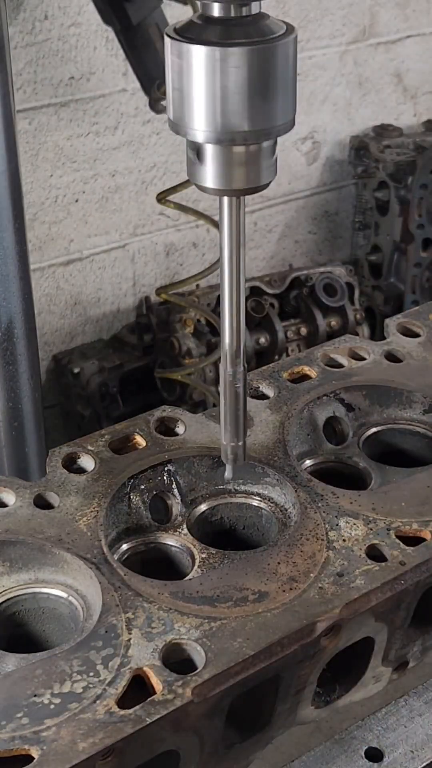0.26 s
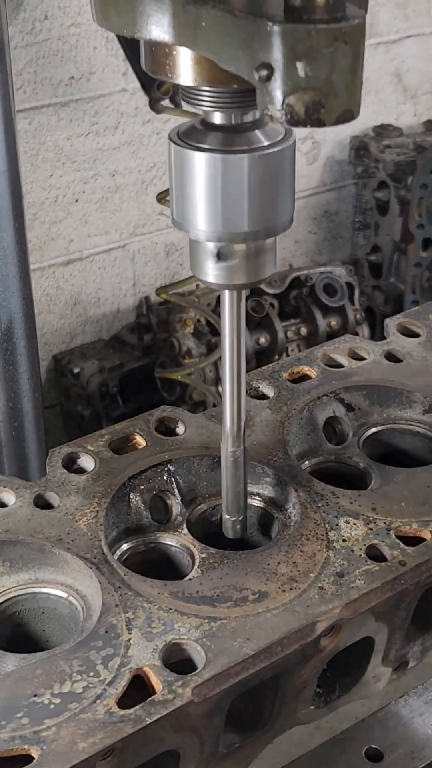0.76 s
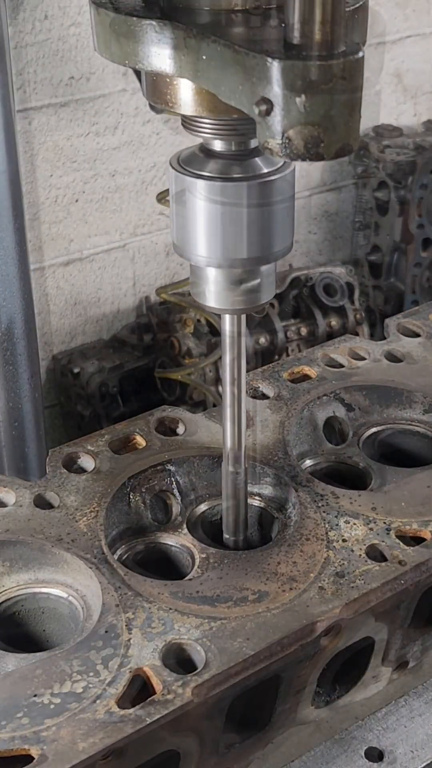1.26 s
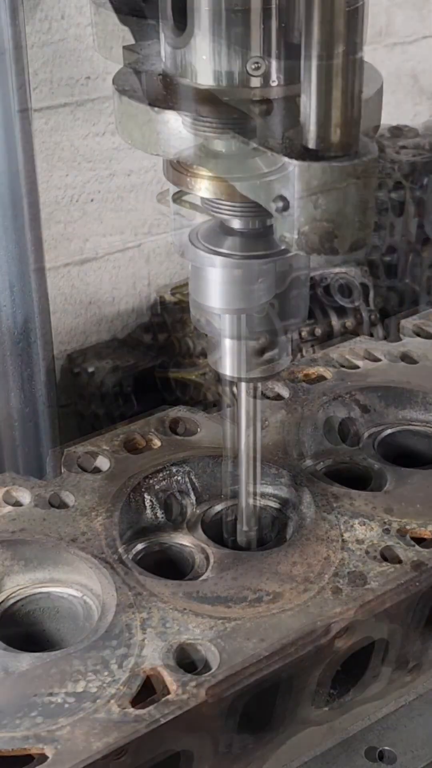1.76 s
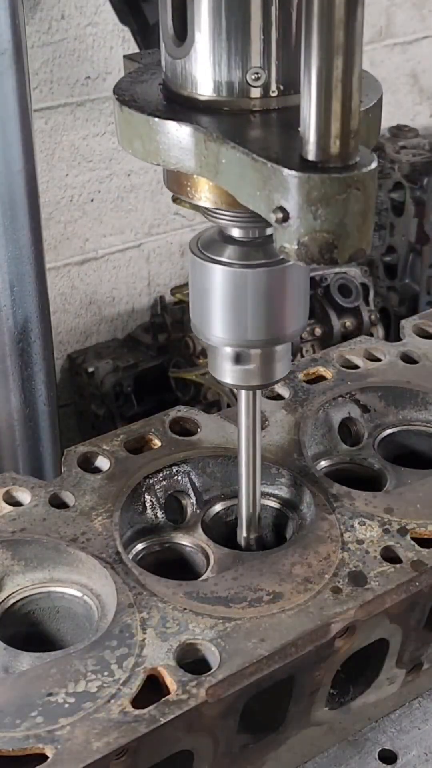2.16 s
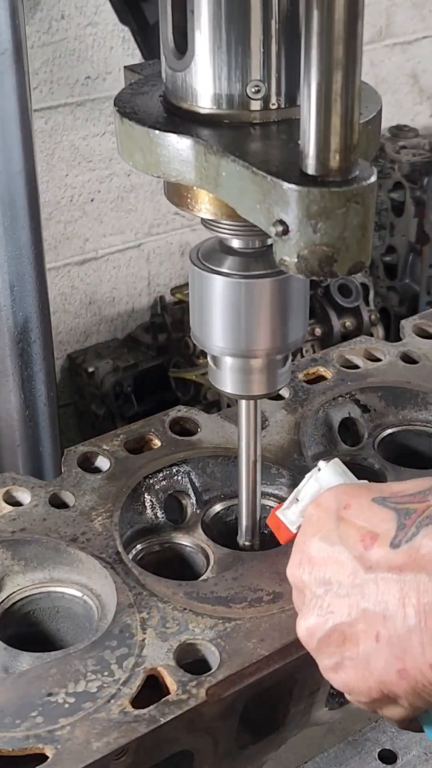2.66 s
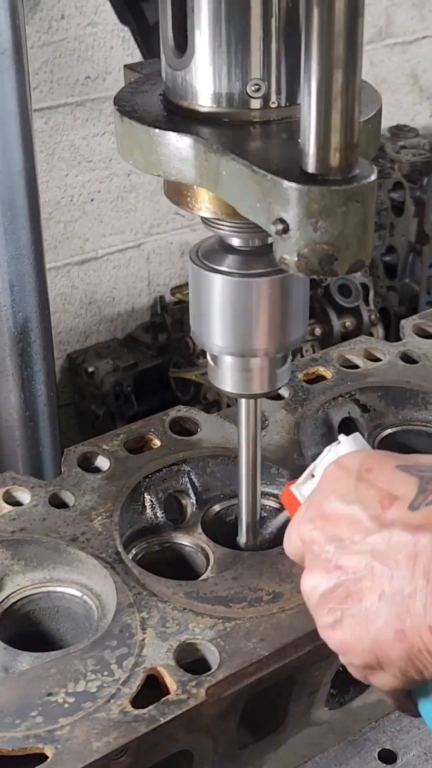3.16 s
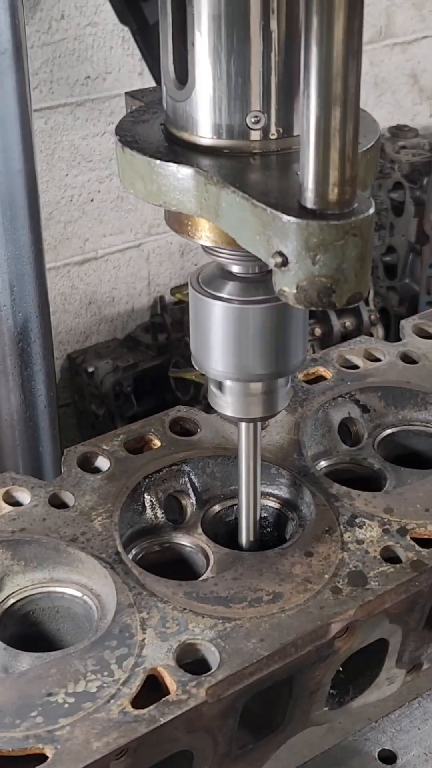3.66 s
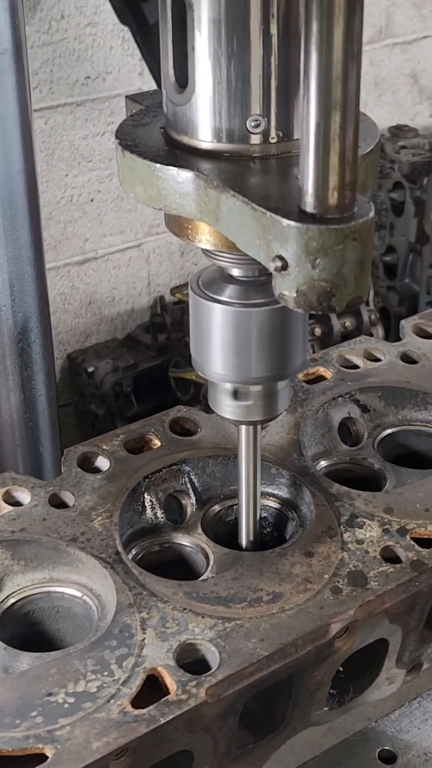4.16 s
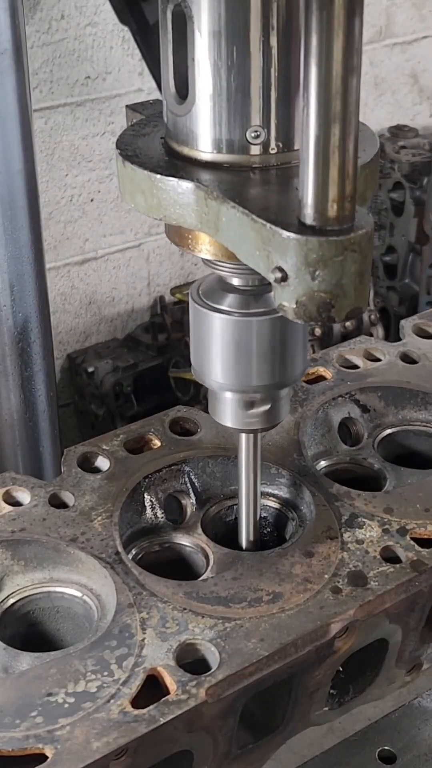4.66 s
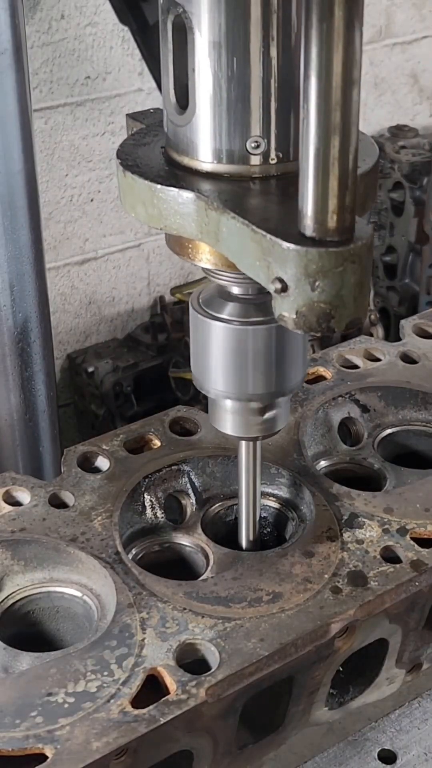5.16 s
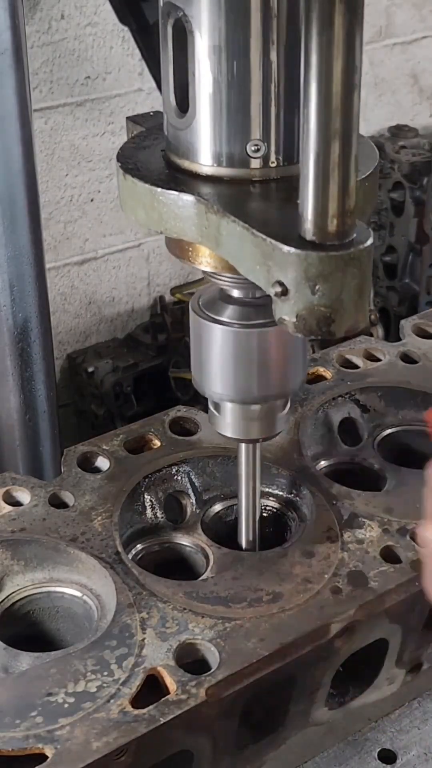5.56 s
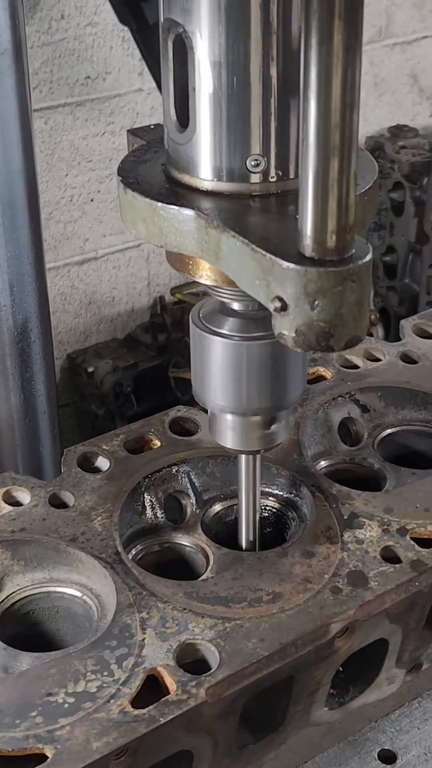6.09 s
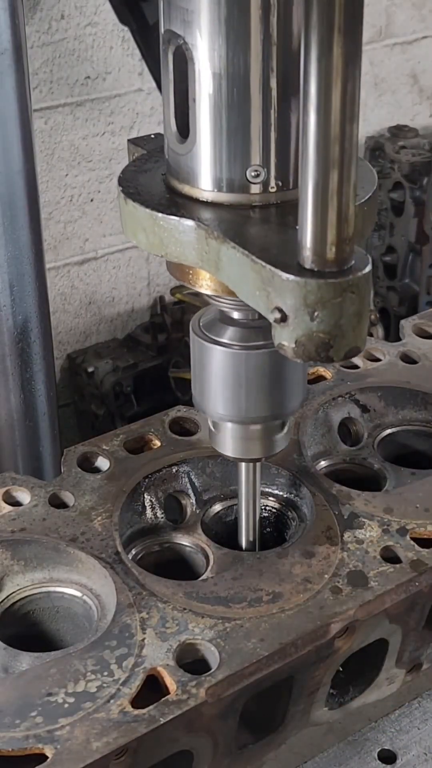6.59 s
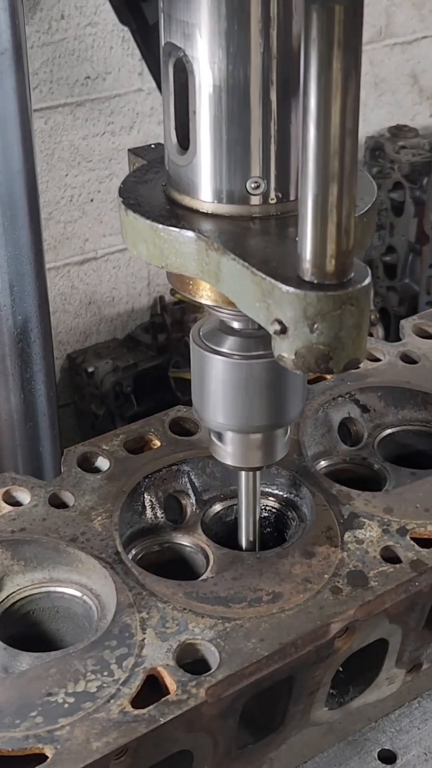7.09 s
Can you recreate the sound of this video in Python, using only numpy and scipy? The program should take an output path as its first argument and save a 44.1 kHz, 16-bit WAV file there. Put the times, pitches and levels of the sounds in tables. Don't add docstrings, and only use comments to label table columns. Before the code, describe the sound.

Workshop boring machine: spray ticks, motor starts whining, head clatters down, brief silence, then a reamer grinds and squeals, singing metallically in stuttering bites.

```python
import sys
import numpy as np
from scipy import signal
from scipy.io import wavfile

SR = 44100
rng = np.random.default_rng(int(sys.argv[2]) if len(sys.argv) > 2 else 0)


def generate_wav(signal):
    frames = np.transpose(np.atleast_2d(signal))
    scaled = np.clip(frames, -1, 1) * 32767
    pcm = np.round(scaled).astype(np.int16)
    wavfile.write(sys.argv[1], SR, pcm)


def voltage_ratio(decibels):
    exponent = np.asarray(decibels, float) / 20
    return 10 ** exponent


N = 323237
TIME_S = np.arange(N) / SR
SLICES_PER_S = 39.72
BODY_EDGE_HZ = 3750
MOTOR_ON_S = 0.372
CUT_RISE_DB_PER_S, CUT_FALL_DB_PER_S = 500.0, 900.0


def in_time(rows):
    return np.interp(TIME_S, *np.transpose(rows))


def rms_one(x):
    return x / np.sqrt(np.mean(x ** 2) + 1e-20)


def at_hz(points, hz):
    points = np.array(points)
    return np.interp(np.log(hz), np.log(points[:, 0]), points[:, 1])


def band_pass(x, low_hz, high_hz):
    return signal.sosfilt(signal.butter(2, [low_hz, high_hz], "band", fs=SR, output="sos"), x)


def below_edge(x):
    return signal.sosfilt(signal.cheby2(8, 30, BODY_EDGE_HZ + 250, fs=SR, output="sos"), x)


def drift(rate_hz):
    r = np.exp(-80 * np.pi * rate_hz / SR)
    slow = signal.lfilter([1], [1, -2 * r, r * r], rng.standard_normal(N // 40 + 2002))[2000:]
    return np.interp(np.arange(N) / 40, np.arange(len(slow)), rms_one(slow - slow.mean()))


def bursts(rows, rise, fall):
    s, length, db = np.transpose(rows)[:, :, None]
    t = np.arange(0, N / SR + .002, .001)
    rise_db = rise * np.maximum(s - t, 0)
    fall_db = np.reshape(fall, (-1, 1)) * np.maximum(t - s - np.abs(length), 0)
    gain = voltage_ratio(db - rise_db - fall_db)
    return np.interp(TIME_S, t, gain.max(axis=0))


def splices(overlap, shift):
    count = TIME_S * SLICES_PER_S + 1 + shift
    fade = np.clip((count % 1 - 1) / overlap + 1, 0, 1)
    return count.astype(int), np.sin(np.pi / 2 * fade) ** 2


def spliced_tones(tones, jump, dip, shift, level_db):
    k, fade = splices(.7, shift)
    out = 0
    for hz, db, pan_db, spread_hz in tones:
        step, size, detune = rng.standard_normal((3, k[-1] + 2))
        w = 2 * np.pi * (hz + spread_hz * detune)
        gain = voltage_ratio(db + level_db * size)
        start_s = (np.arange(len(w)) - 1 - shift) / SLICES_PER_S
        phase = np.cumsum(jump * step) + (2 * np.pi * hz - w) * start_s
        this_slice = gain[k] * np.sin(w[k] * TIME_S + phase[k])
        next_slice = gain[k + 1] * np.sin(w[k + 1] * TIME_S + phase[k + 1])
        left = (1 - fade) * this_slice + fade * next_slice
        right = np.roll(left, round(rng.uniform(0, 1.2) * hz / 1000))
        out = out + voltage_ratio([[pan_db / 2], [-pan_db / 2]]) * np.array([left, right])
    return 2.0 * out * (1 - dip * 4 * fade * (1 - fade))


# frequency in Hz, likeness from -1 to 1.
PORT_LIKENESS = [(60, 0.99), (130, 0.99), (290, 0.95), (640, 0.69), (1410, -0.21), (3100, 0.0078),
                 (6820, -0.16), (15000, -0.061)]
# frequency in Hz, left over right in dB.
PORT_LEAN = [(60, 0.5), (130, 0.5), (290, 1), (640, 1), (1410, 0), (3100, 1), (6820, -0.5), (15000, 0.0)]


def coloured(spectrum, patchy_db, grain_db=0.0, per_s=3000):
    heard = [hz for hz, db in spectrum if db > -70]
    low_hz, top_hz = heard[0], min(heard[-1], .45 * SR)
    edges = np.geomspace(low_hz, top_hz, round(3 * np.log2(top_hz / low_hz)) + 1)
    white = rng.standard_normal((2, 2, N))
    together = drift(2.2)
    out = 0
    if grain_db:
        click = voltage_ratio(grain_db * np.minimum(rng.exponential(1, N), 3))
        white *= 0.45 + (rng.random(N) < per_s / SR) * click
    for k, (low, high) in enumerate(zip(edges, edges[1:])):
        mid, side = band_pass(white[k % 2], low, high)
        hz = np.sqrt(low * high)
        alike = np.clip(at_hz(PORT_LIKENESS, hz), -1, 1)
        lean_db = at_hz(PORT_LEAN, hz) / 2
        flicker_db = patchy_db * (0.31 * together + drift(10.0)) if patchy_db else 0
        gain = voltage_ratio(at_hz(spectrum, hz) + flicker_db) * voltage_ratio([[lean_db], [-lean_db]])
        out = out + gain * (np.sqrt(1 + alike) * mid + np.sqrt(1 - alike) * side * [[1], [-1]])
    return rms_one(out)


# frequency in Hz, level in dB per Hz.
ROOM_SPECTRUM = [(120, -39.5), (200, -18), (232, -14.5), (338, -22), (535, -19.5), (587, -21.5),
                 (5000, -35), (6500, -75), (11000, -120)]
RUMBLE_SPECTRUM = [(11, -42.5), (18, -7.5), (43, -4.5), (97, 4), (122, 4.5), (173, -6.5), (220, -11),
                   (290, -33), (480, -120)]


def workshop():
    room = voltage_ratio(-43) * coloured(ROOM_SPECTRUM, patchy_db=-1.0)
    return room + voltage_ratio(-33.5) * coloured(RUMBLE_SPECTRUM, patchy_db=1.0)


# start in seconds, length in seconds, level of the shank's song in dB.
BITE_EVENTS = [(2.05, 0.059, -40.5), (2.16, 0.11, -41), (2.385, 0.28, -41.5), (2.7, 0.56, -44),
               (3.47, 0.2, -43), (3.735, 0.15, -43), (3.97, 0.04, -41.5), (4.095, 0.048, -42.5),
               (4.21, .05, -43), (4.32, .685, -43), (5.135, .2, -42), (5.48, 0.25, -42), (5.8, 0.184, -44),
               (6.12, .13, -48), (6.27, .36, -44.5), (6.72, .06, -44), (6.86, 0.088, -46),
               (6.95, 0.12, -43.5), (7.14, 0.23, -44)]


def biting():
    return bursts(BITE_EVENTS, rise=450.0, fall=650.0) * voltage_ratio(.6 * drift(7.5))


# frequency in Hz, level in dB per Hz.
AIR_SPECTRUM = [(2240, -37), (3800, 0.5), (4120, -11), (5780, -6.5), (7380, -9), (8800, -13.5),
                (10800, -18), (12600, -9.5), (14500, -16), (15300, -15)]
# start in seconds, length in seconds, level in dB.
CHIP_EVENTS = [
    (1.965, 0.88, -40),
    (2.86, 0.405, -46),
]
CHIP_FALLS = [58, 900.0]
# start in seconds, length in seconds, level in dB.
PUFF_EVENTS = [(.03, .03, -43), (.07, 0.052, -50.5), (.385, .005, -39), (.44, .01, -49), (.51, .01, -50),
               (.9, .03, -65), (1.005, 0.0072, -49), (1.27, 0.084, -48), (1.87, .01, -51), (2.47, .03, -47),
               (3.37, .06, -52), (3.56, .03, -49), (3.74, 0.069, -50), (4.0, .004, -58), (5.53, 0.082, -55),
               (5.9, .03, -44), (6.12, 0.13, -47.5), (6.76, .02, -53), (7.17, .03, -51)]


def hiss(bite):
    chips = bursts(CHIP_EVENTS, CUT_RISE_DB_PER_S, CHIP_FALLS)
    puffs = bursts(PUFF_EVENTS, rise=303, fall=153)
    air = voltage_ratio(np.where(TIME_S < MOTOR_ON_S, -54, -50.5))
    bite_chips = voltage_ratio(-7) * bite
    power = air ** 2 + bite_chips ** 2 + chips ** 2 + puffs ** 2
    return np.sqrt(power) * coloured(AIR_SPECTRUM, patchy_db=1.2)


# start in seconds, peak in dB, ring in Hz, 60 dB decay in seconds, crack in dB.
TICK_EVENTS = [(0.0014, -20.5, 1630, 0.04, -15), (0.026, -29, 6800, 0.031, -6),
               (0.0333, -25.5, 1880, 0.038, -6), (0.126, -39, 2970, 0.04, -14),
               (0.1437, -23, 1960, 0.028, -7), (0.3704, -12, 3150, 0.041, -4),
               (0.4344, -12, 3120, 0.017, -8), (0.575, -15, 2160, 0.047, -9), (1.8333, -13, 2160, 0.1, -22),
               (1.8456, -27, 3000, 0.075, -25), (3.253, -27, 3780, 0.039, -14),
               (3.488, -16, 1500, 0.04, -22), (3.881, -28, 2190, 0.04, -20),
               (4.584, -21.5, 2250, 0.081, -12.5), (5.597, -29, 2210, 0.059, -9),
               (5.791, -23.5, 3150, 0.041, -15), (5.8275, -33, 2290, 0.04, -20),
               (5.861, -14, 2100, 0.072, -10), (6.7453, -30, 2170, 0.04, -14)]


def ticks():
    out = np.zeros((2, N))
    t = np.arange(SR // 8) / SR
    for s, db, hz, t60, crack_db in TICK_EVENTS:
        burst = rng.standard_normal((2, len(t))) * voltage_ratio(-60 * t / np.clip(t60, .005, .2))
        part = band_pass(burst, hz / 1.45, hz * 1.69)
        crack = signal.sosfilt(signal.butter(2, 5500, "high", fs=SR, output="sos"), burst)
        at = round(s * SR)
        out[:, at:at + len(t)] += voltage_ratio(db) * (part / np.abs(part).max() * 1.34 + voltage_ratio(crack_db) * crack * 0.92)
    return out


def ring(s, hz, t60):
    t = np.maximum(TIME_S - s, 0)
    return np.sin(2 * np.pi * hz * t) * voltage_ratio(-60 * t / t60)


# start in seconds, peak in dB, pitch in Hz, 60 dB decay in seconds.
THUD_EVENTS = [
    (0.376, -12.5, 477, 0.075),
    (.6, -28, 45, 0.51),
    (3.968, -17, 108, 0.14),
    (4.19, -24, 75, 0.18),
    (5.96, -22, 82, .25),
]


def thuds():
    out = np.zeros((2, N))
    for s, db, hz, t60 in THUD_EVENTS:
        out += voltage_ratio(db) * (ring(s, hz, t60) + .5 * ring(s + 0.00435, hz * 0.52, t60))
    return out


# frequency in Hz, level in dB per Hz.
KNOCK_SPECTRUM = [(76, -54.5), (130, -20), (232, -7.5), (362, -8), (479, -10.5), (564, -11.5), (855, -9),
                  (977, -16.5), (1480, -8.5), (4500, -23.5), (5850, -60.5), (9900, -120)]
JANGLE_SPECTRUM = [(2060, -50.5), (3500, -11.5), (6850, -6), (9700, -22), (13400, -7.5), (15100, -18.5),
                   (15500, -25), (15900, -56)]
# start in seconds, length in seconds, body in dB, jangle over body in dB, decay in dB per second.
KNOCK_EVENTS = [
    (0.571, .008, -18.5, -8.5, 190.0),
    (0.583, 0.028, -11.5, -12, 191),
    (0.733, 0.043, -11, -6.5, 150.0),
    (0.807, 0.038, -12, -10.5, 380.0),
    (3.483, 0.022, -16, -12, 950.0),
    (3.522, .004, -21, -13, 650.0),
    (5.542, 0.067, -34, -16, 300.0),
    (5.827, 0.0073, -16.5, -15, 600.0),
    (5.86, 0.0096, -15, -10.5, 1100.0),
]


def clatter():
    s, length, db, bright_db, fall = np.transpose(KNOCK_EVENTS)
    body = bursts(np.c_[s, length, db], 2600.0, fall)
    bright = bursts(np.c_[s, length, db + bright_db], 2600.0, 1.46 * fall)
    knock = body * coloured(KNOCK_SPECTRUM, patchy_db=0.5, grain_db=2.0, per_s=2200)
    return knock + bright * coloured(JANGLE_SPECTRUM, patchy_db=0.5)


# pitch in Hz, level in dB, left over right in dB, spread in Hz.
IDLE_WHINE = [(554, 0, -4, 13), (958, -15, 1, 14), (1480, -16, 1, 50), (1850, -23, 0, 40),
              (2910, -18, 0, 60)]
LOADED_WHINE = [(710.7, -1.5, 12, 11.2), (739, -17, 22, 4.5)]
# time in seconds, strength of the loaded whine in dB.
SPINDLE_LOAD = [(.4, -41), (.56, -42), (1.15, -41), (1.5, -35.5), (1.61, -38), (1.82, -43), (1.95, -34.5),
                (3.24, -38), (3.3, -43), (3.45, -38), (3.6, -36), (5.8, -35), (7.33, -32.5)]
# frequency in Hz, level in dB per Hz.
WASH_SPECTRUM = [(120, -46.5), (200, -15), (514, -10.5), (716, -10.5), (810, -15.5), (997, -16.5),
                 (1270, -13.5), (1420, -29.5), (2010, -14.5), (2300, -33), (2760, -22), (3750, -21.5),
                 (4880, -74.5), (8250, -120)]
# start in seconds, length in seconds, level in dB.
GEAR_SHAKES = [
    (.4, 0.04, -33.5),
    (.9, 0.043, -35),
]


def motor():
    load_db = in_time(SPINDLE_LOAD)
    running = np.clip((TIME_S - MOTOR_ON_S) / 0.0033, 0, 1)
    engage_s, engage_length_s = 1.803, 0.23
    idle_db = np.interp(TIME_S, [engage_s, engage_s + engage_length_s], [-35.5, -58.5])
    loaded = voltage_ratio(load_db - 1.5) * spliced_tones(LOADED_WHINE, jump=1.2, dip=.4, shift=-.2, level_db=1.5)
    idle = voltage_ratio(idle_db) * spliced_tones(IDLE_WHINE, jump=1.86, dip=.1, shift=0.031, level_db=1.0)
    steady = voltage_ratio(-34.5 + 0.1 * (load_db - load_db.mean()))
    wash = np.hypot(steady, bursts(GEAR_SHAKES, rise=200.0, fall=26))
    gears = wash * below_edge(coloured(WASH_SPECTRUM, patchy_db=1.5, grain_db=3.5))
    return running * (loaded + idle + gears)


# start in seconds, length in seconds, pitch in Hz, level in dB.
SQUEAK_EVENTS = [(2.112, 0.021, 5540, -30.5), (2.596, .06, 5800, -44), (2.097, 0.055, 1082, -35),
                 (3.419, .04, 1010, -33), (3.596, .02, 5300, -47), (3.745, .02, 5200, -45),
                 (4.003, .035, 3600, -43), (4.125, 0.036, 3560, -40.5), (6.735, 0.054, 1410, -38.5),
                 (6.79, .015, 2800, -44), (6.961, .03, 1380, -39)]


def squeaks():
    out = np.zeros((2, N))
    t = np.arange(SR // 8) / SR
    width = 0.017
    for s, length, hz, db in SQUEAK_EVENTS:
        swell = np.sin(np.pi * np.clip(t / (length + 0.018), 0, 1))
        friction = band_pass(rng.standard_normal((2, len(t))), hz * (1 - width), hz * (1 + width))
        at = round((s - .01) * SR)
        out[:, at:at + len(t)] += voltage_ratio(db) * swell * rms_one(friction)
    return out


# pitch in Hz, level in dB, left over right in dB, spread in Hz.
SHANK_SONG = [(2220, 0, -4, 20), (1385, -14, 1, 40), (3040, -16, 0, 40), (3360, -16, 0, 40),
              (3600, -11, 0, 45)]
# frequency in Hz, level in dB per Hz.
RASP_SPECTRUM = [(1100, -37.5), (1300, -10), (1450, -15), (1720, -31), (2000, 5), (2600, -20), (3000, -5.5),
                 (3750, -8)]


def shank(bite):
    song = spliced_tones(SHANK_SONG, jump=2.5, dip=.8, shift=.1, level_db=1.5)
    return bite * (song + below_edge(coloured(RASP_SPECTRUM, patchy_db=0.5)))


# frequency in Hz, level in dB per Hz.
GRIT_SPECTRUM = [(94, -51), (160, -30), (200, -11.5), (711, -7.5), (844, -18), (1410, -18), (1700, -36.5),
                 (2180, -18), (2590, -21.5), (3750, -20), (4880, -53), (8250, -120)]
# pitch in Hz, level in dB, left over right in dB, spread in Hz.
GRIND_RINGING = [(1385, -13, 1, 45), (3600, -14, 0, 55), (2220, -12, -3, 25)]


def grind(cut, sizzle):
    grit = below_edge(coloured(GRIT_SPECTRUM, patchy_db=2.0, grain_db=3.5))
    ringing = spliced_tones(GRIND_RINGING, jump=2.5, dip=.75, shift=.1, level_db=3.5)
    ringing = ringing * np.clip((TIME_S - 2.14) / .15 + 1, .3, 1)
    return cut * voltage_ratio(1.5 * drift(4.2)) * (grit + voltage_ratio(-1.0) * ringing + voltage_ratio(-7.5) * sizzle)


# time in seconds, pitch in Hz.
SQUEAL_PITCH = [(1.95, 5400), (1.986, 5360), (2.224, 5740), (2.782, 5800), (2.95, 5600)]
# start in seconds, length in seconds, grinding in dB.
CUT_EVENTS = [
    (1.96, 0.16, -35),
    (2.14, .7, -31.5),
    (2.85, 0.416, -33),
]


def squeal(cut):
    fading = np.clip((2.95 - TIME_S) / 0.076, 0, 1) * np.minimum(2 * cut / cut.max(), 1)
    fading = fading * voltage_ratio(-4 * (TIME_S - CUT_EVENTS[0][0]))
    squeal_hz = in_time(SQUEAL_PITCH)
    flutes = 0
    for below_hz, db in [(0, -2), (-170, -9), (150, -7), (330, -10)]:
        wobble_hz = squeal_hz - below_hz + 95 * drift(300) + 60 * drift(8)
        flutter = voltage_ratio(db + 5.5 * drift(25))
        flutes = flutes + flutter * np.sin(2 * np.pi * np.cumsum(wobble_hz) / SR + [[0], [1.7]])
    return fading * voltage_ratio(-41.5) * flutes


# start in seconds, length in seconds, level in dB.
MIST_EVENTS = [(1.28, .08, -52), (3.74, .08, -53.5), (5.2, .15, -53), (5.5, .15, -48), (6.15, .4, -49)]


def reamer(bite):
    cut = bursts(CUT_EVENTS, CUT_RISE_DB_PER_S, CUT_FALL_DB_PER_S)
    sizzle = band_pass(rng.standard_normal((2, N)), 10800, 14500)
    fizz = (voltage_ratio(-13) * bite + bursts(MIST_EVENTS, rise=60.0, fall=65.0)) * sizzle
    return shank(bite) + grind(cut, sizzle) + fizz + squeal(cut)


def scene():
    bite = biting()
    background = workshop() + hiss(bite)
    knocks = ticks() + thuds() + clatter()
    return background + knocks + motor() + squeaks() + reamer(bite)


# frequency in Hz, share of quiet bands lost.
LOST_BANDS = [(3500, 0), (4200, .02), (7800, .02), (8500, .22), (11200, .27), (12000, .03), (14300, .04),
              (15000, .3), (15400, .9)]


def dropouts(x):
    hz, s, z = signal.stft(x, SR, nperseg=512, noverlap=384)
    draw = rng.random((len(hz) // 3 + 1, len(s) // 12 + 1))
    draw = draw.repeat(3, axis=0).repeat(12, axis=1)[:len(hz), :len(s)]
    loud = np.abs(z[:, 50:]).mean(axis=(0, 1))
    quietness = np.clip(np.median(loud) / (loud + 1e-12), 0, 1.5)
    share = at_hz(LOST_BANDS, np.maximum(hz, 1))[:, None] * quietness
    return signal.istft(z * (draw > share), SR, nperseg=512, noverlap=384)[1][:, :N]


def top_cut(x):
    return signal.sosfilt(signal.butter(12, 16050, fs=SR, output="sos"), x)


def record(dry):
    x = signal.sosfilt(signal.cheby2(14, 80, 16050, fs=SR, output="sos"), np.tanh(dry))
    silence_s, resume_s = 1.6188, 1.749
    gap = np.clip(np.maximum((silence_s - TIME_S) / .0005, (TIME_S - resume_s) / .002), 0, 1)
    return top_cut(dropouts(x) * gap)


dry = scene()
out = record(dry)
generate_wav(out)
```